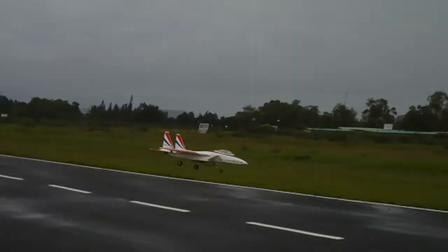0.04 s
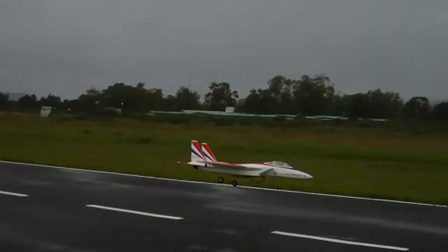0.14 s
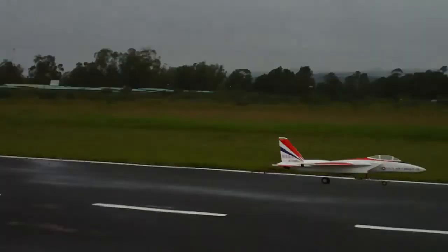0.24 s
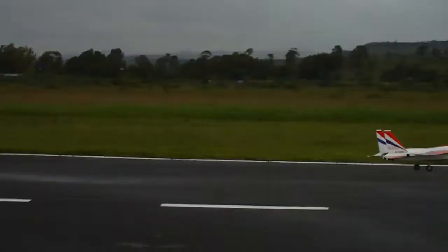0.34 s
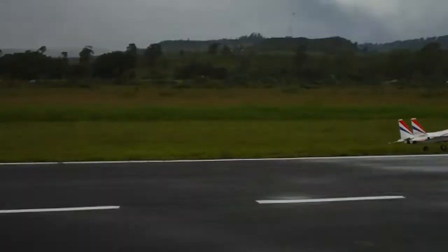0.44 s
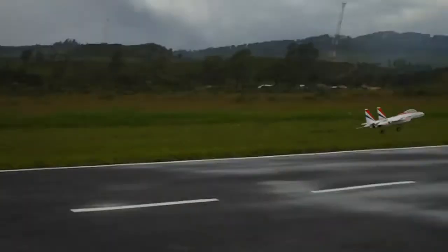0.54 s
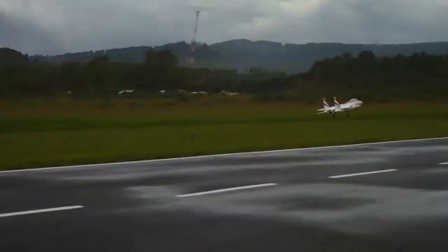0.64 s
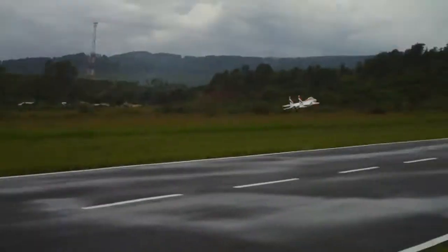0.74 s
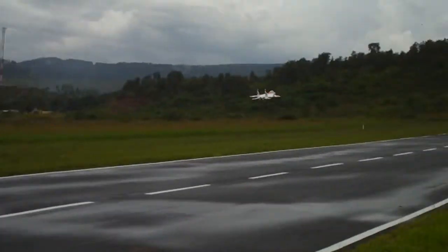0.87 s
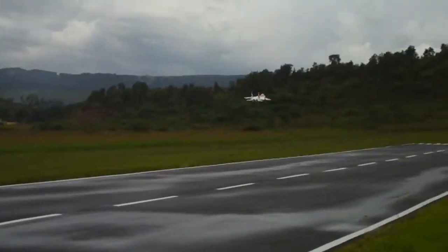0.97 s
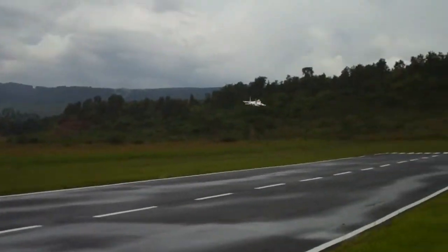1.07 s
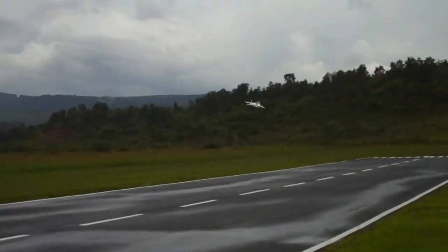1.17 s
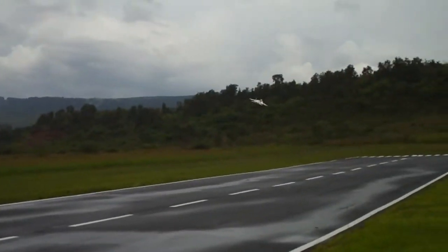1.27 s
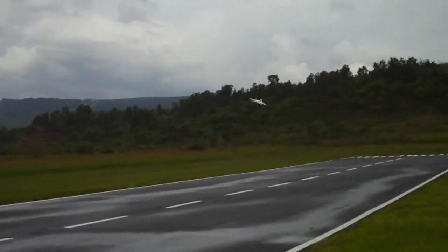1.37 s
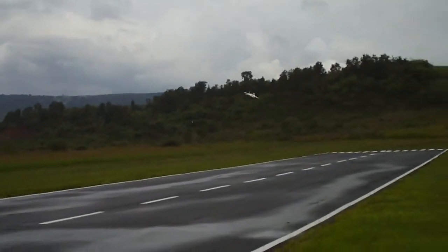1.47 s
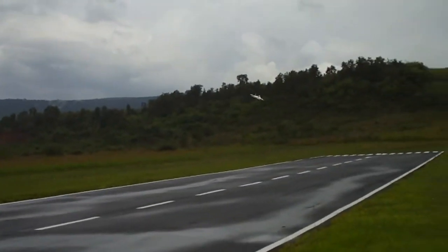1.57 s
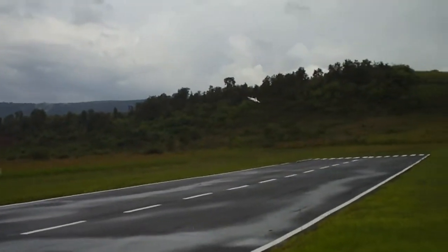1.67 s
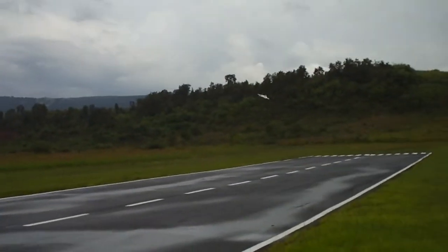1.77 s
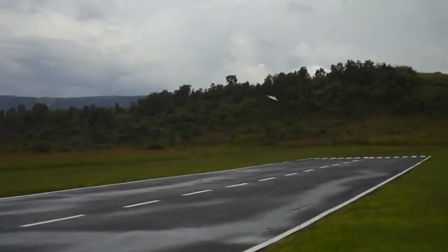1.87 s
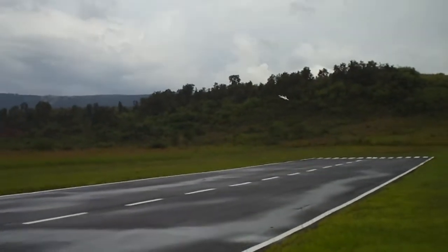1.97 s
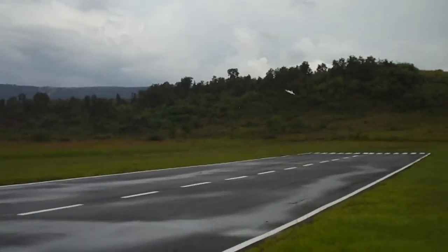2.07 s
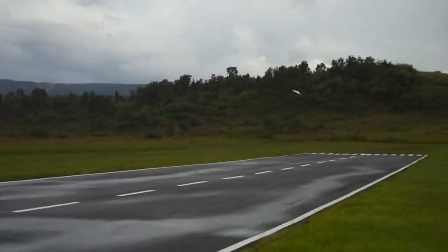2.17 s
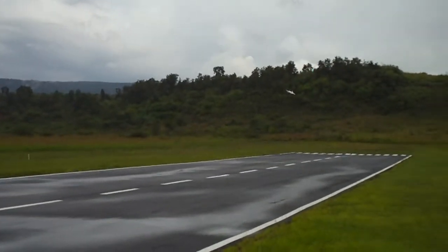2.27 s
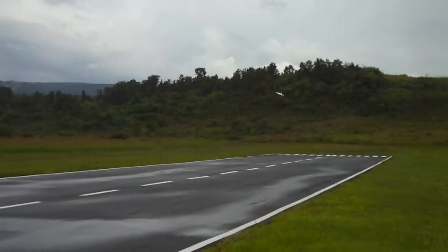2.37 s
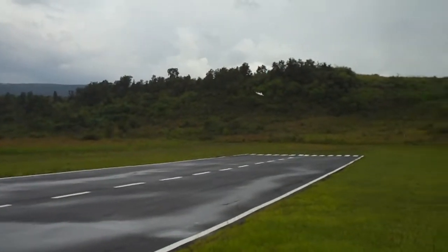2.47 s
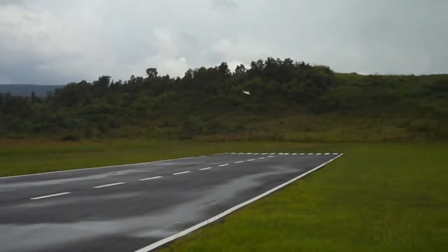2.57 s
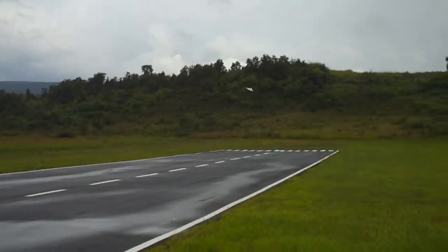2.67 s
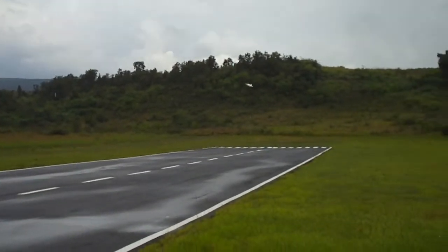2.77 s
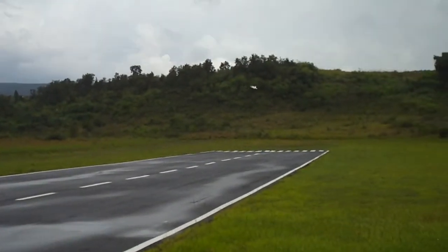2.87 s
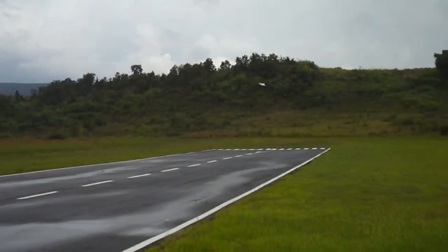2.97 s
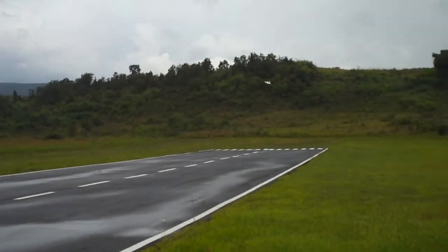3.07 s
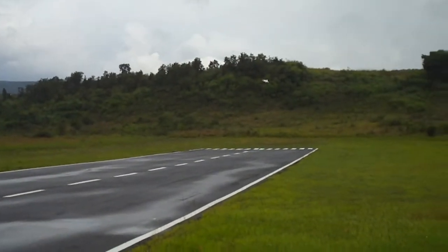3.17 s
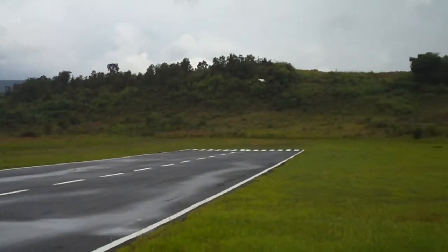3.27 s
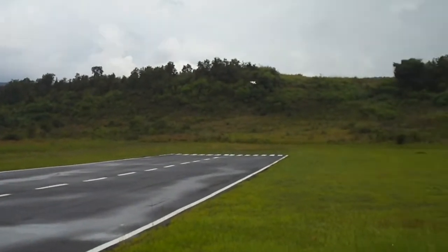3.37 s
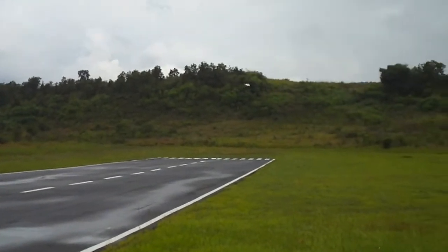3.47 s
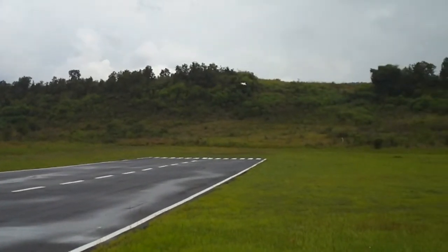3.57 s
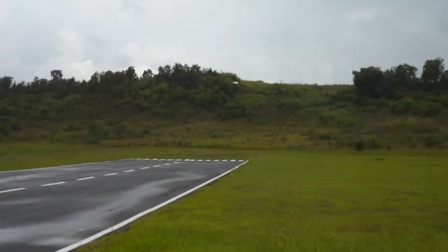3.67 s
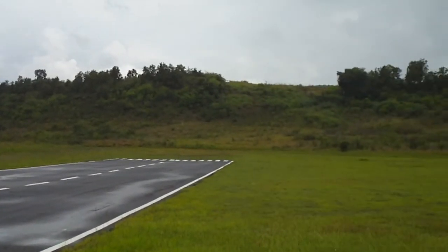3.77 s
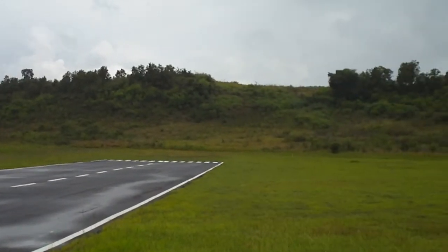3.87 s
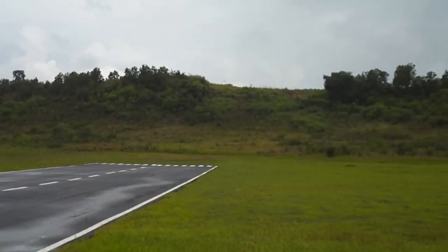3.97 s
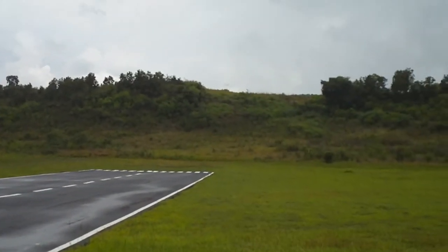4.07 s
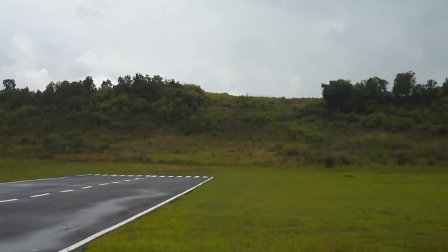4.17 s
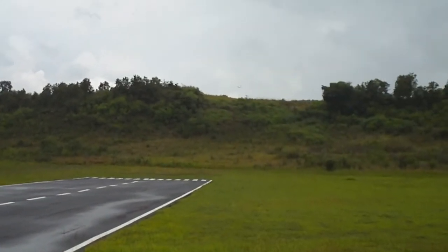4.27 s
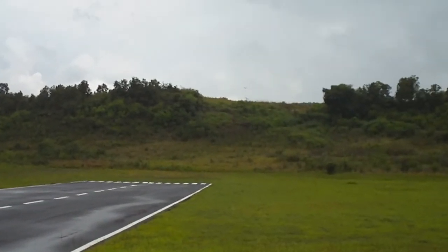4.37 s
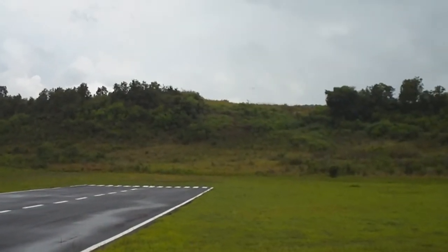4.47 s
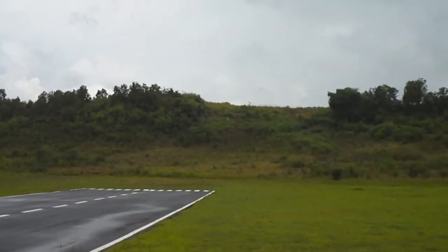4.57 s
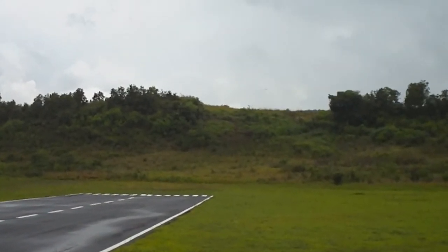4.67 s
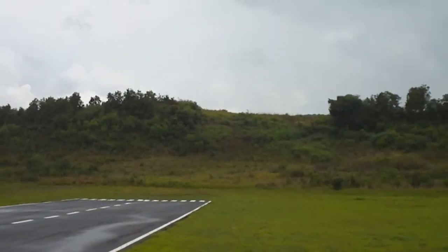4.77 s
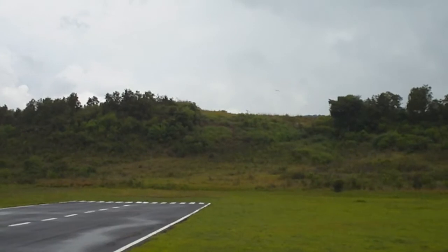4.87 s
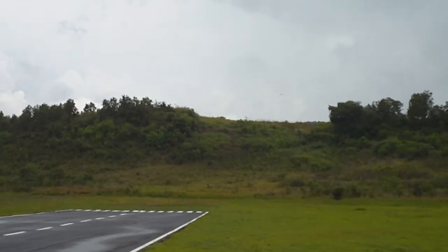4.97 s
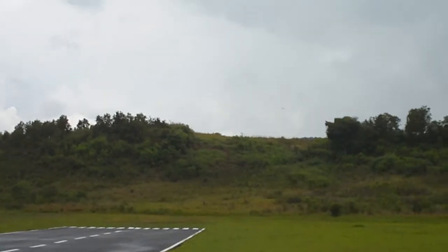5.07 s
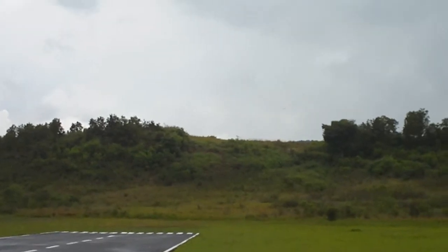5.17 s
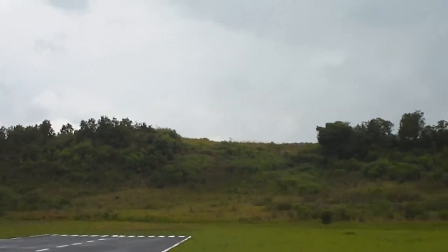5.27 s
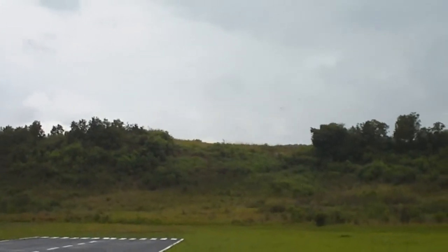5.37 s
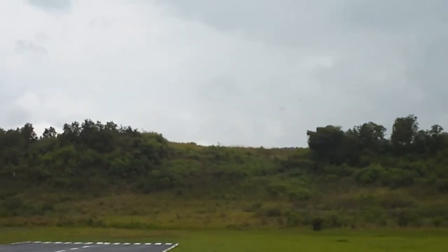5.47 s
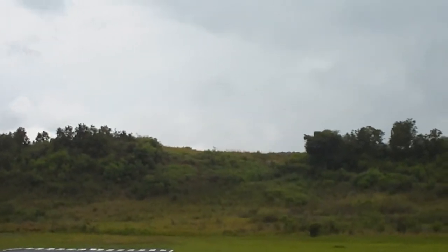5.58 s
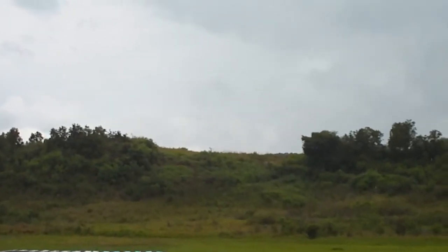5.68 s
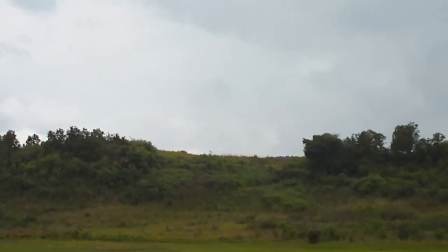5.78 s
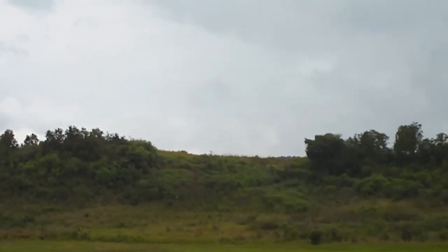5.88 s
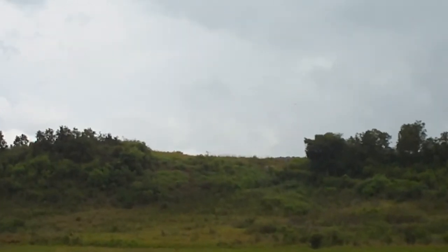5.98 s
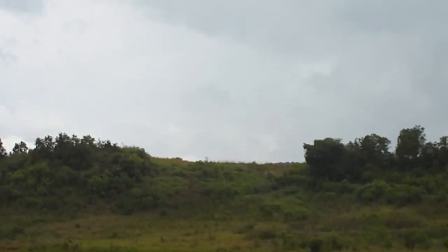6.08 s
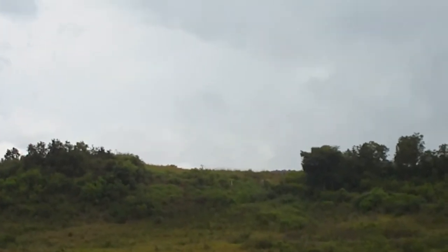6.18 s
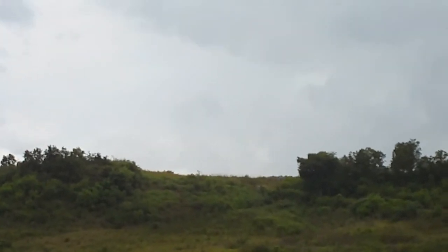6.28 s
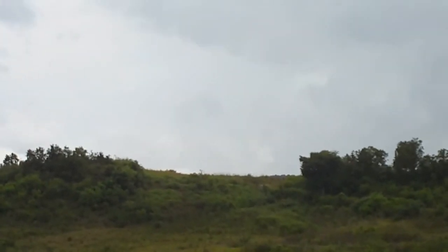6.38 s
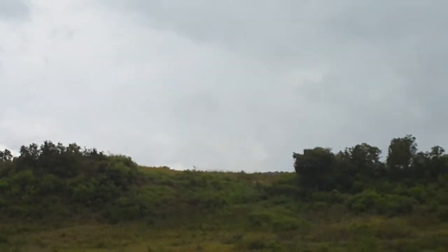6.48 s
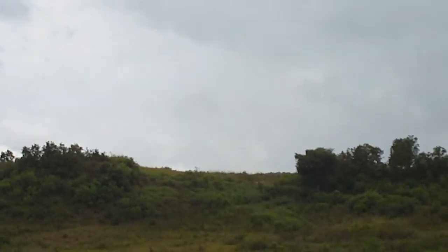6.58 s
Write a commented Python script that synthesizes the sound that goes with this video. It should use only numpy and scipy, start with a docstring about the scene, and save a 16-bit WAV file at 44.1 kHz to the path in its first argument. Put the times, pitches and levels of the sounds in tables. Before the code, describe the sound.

Shrill electric model jet with airy exhaust hiss sweeps low past, drops in pitch, throttles up while receding, leaving faint whine, insect buzz and bird chips.

```python
"""An electric ducted-fan model jet passes low over a runway, recedes, then opens the throttle as it climbs away.
Shaft harmonics and shaped exhaust noise reach the microphone with Doppler shift, directivity, spreading and
air absorption; interference with the ground bounce sweeps a comb through them. From the start there are also
soft air noise, a far engine's harmonics and insects made of sliding tones and narrow-band noise. Filtered
noise clicks and low bumps come from the hand-held camera, and a few gliding bird chips end the scene."""
import sys
import numpy as np
from scipy import signal
from scipy.fft import rfft, irfft, next_fast_len
from scipy.io import wavfile
from scipy.ndimage import uniform_filter1d

SR = 44100
rng = np.random.default_rng(int(sys.argv[2]) if len(sys.argv) > 2 else 0)


def log_audio(samples):
    """Write samples as a 16-bit WAV file to the path given in sys.argv[1]."""
    # one column per channel
    frames = np.atleast_2d(samples).T
    # limit to full scale, then quantise
    limited = np.clip(frames, -1, 1)
    pcm = np.round(limited * 32767).astype(np.int16)
    wavfile.write(sys.argv[1], SR, pcm)


N = 292383
TIME = np.arange(N) / SR
FRAME_S = np.arange(N // 128 + 6) * 128 / SR
# the fly-by: moment of closest approach, its distance, airspeed
PASS_S, NEAREST_M, SPEED_M_PER_S = .375, 5.31, 22.28
SOUND_M_PER_S = 343


def amp(db):
    """Decibel law: twenty decibels are a factor of ten in amplitude."""
    return 10 ** (np.asarray(db) / 20)


def unit(x):
    """Normalization by root mean square: scales x to rms 1."""
    return x / np.sqrt(np.mean(x ** 2) + 1e-20)


def at(rows, t):
    """Linear interpolation: the columns of a curve table at times t."""
    s, *columns = np.transpose(rows)
    return [np.interp(t, s, c) for c in columns]


def colour(points, hz):
    """Spectral envelope: interpolates a table on a log-frequency axis."""
    f, values = np.transpose(points)
    return np.interp(np.log(hz + 1), np.log(f), values)


def shaped(x, gain):
    """Linear filtering: multiplies the spectrum of x by a gain given as a function of frequency."""
    size = next_fast_len(len(x), real=True)
    spectrum = rfft(x, size) * gain(np.fft.rfftfreq(size, 1 / SR))
    return irfft(spectrum, size)[:len(x)]


def drift(hz):
    """Low-passed noise: random motion of rms 1, up to about hz."""
    return unit(shaped(rng.standard_normal(N), lambda f: 1 / (1 + (f / hz) ** 4)))


def band(hz, width_hz):
    """Resonance: noise of rms 1 concentrated around one frequency."""
    return unit(shaped(rng.standard_normal(N), lambda f: 1 / (1 + ((f - hz) / width_hz) ** 4)))


def flight(t):
    """Doppler effect: distance (m), angle from the nose (degrees), heard shaft rate (Hz), throttle (0-1)."""
    # shaft rate as the throttle opens from part to full: (time [s], rate [Hz])
    motor = [(.68, 574.6), (1.969, 576.5), (2.097, 603), (2.384, 630), (2.466, 630.4), (2.626, 631.1),
             (2.69, 640.7), (2.8, 643), (3.03, 643.6), (5.8, 643.4), (6.63, 643)]
    along = SPEED_M_PER_S * (t - PASS_S)
    metres = np.hypot(along, NEAREST_M)
    motor_hz = at(motor, t)[0]
    receding_mach = SPEED_M_PER_S / SOUND_M_PER_S * along / metres
    heard_hz = motor_hz / (1 + receding_mach)
    throttle = (motor_hz - motor_hz.min()) / np.ptp(motor_hz)
    angle = np.degrees(np.arccos(-along / metres))
    return metres, angle, heard_hz, throttle


def travel(hz, t, metres, fall_db, air_db_per_m_khz=.0095, grazing_m=5.5):
    """Two-path interference: gain from spreading (dB per doubling), air absorption and the ground bounce."""
    # delay of the bounce, wavering at first, then growing as the jet climbs away: (time [s], delay [ms])
    bounce_delay = [(0, 0.81), (.4, 0.83), (1, 0.72), (1.63, 0.83), (2, 0.83), (2.4, 0.82), (2.9, 0.77),
                    (3.8, 0.95), (4.35, 1.042), (5.15, 1.234), (5.88, 1.407), (6.63, 1.53)]
    # grass softens the bounce: (frequency [Hz], strength [0-1])
    grass_bounce = [(100, 0.24), (600, 0.38), (1200, 0.57), (1800, 0.58), (2400, 0.76), (3200, 0.71),
                    (6000, 0.41), (9000, 0.051), (15000, .15)]
    # grass holds the bounce back: (frequency [Hz], lag [cycles])
    grass_lag = [(60, .03), (600, 0.27), (1200, 0.53), (1800, 0.65), (2400, 0.92), (3200, 1.09),
                 (5400, 1.19), (9000, 1.04)]
    # the bounce grows strong well beyond the grazing distance
    grazing = np.clip(1 - grazing_m / metres, 0, 1)
    bounce = np.clip(colour(grass_bounce, hz), 0, .95) * grazing
    cycles = hz * at(bounce_delay, t)[0] / 1000 + colour(grass_lag, hz)
    comb = np.sqrt(1 + 2 * bounce * np.cos(2 * np.pi * cycles) / (1 + bounce ** 2))
    spreading_db = fall_db * np.log2(metres / NEAREST_M)
    absorption_db = air_db_per_m_khz * metres * hz / 1000
    return comb * amp(-spreading_db - absorption_db)


def beam(directions_db, full_db, banked_db):
    """Directivity: level (dB) sent towards the microphone, by direction, throttle and bank."""
    # directions from the nose, from ahead to astern: (angle [degrees])
    beam_deg = [30, 55.4, 98.5, 140.2, 160, 175.2]
    # the jet banks into a turn between these times: (start [s], end [s])
    turn_s = [2.87, 3.55]
    _, angle, _, throttle = flight(FRAME_S)
    bank = np.interp(FRAME_S, turn_s, [0, 1])
    return np.interp(angle, beam_deg, directions_db) + throttle * full_db + bank * banked_db


def fan(flutter=0.000402, strong_waver_db=0.64, weak_waver_db=1.5, near_waver_db=0.2754, fall_db=3.95):
    """Harmonic radiation: each shaft order has its beam; turbulent air flickers high orders most when near."""
    # strong tones at the closest distance:
    # (shaft order, level in six directions [dB x 6], added at full throttle [dB], added when banked [dB])
    strong_tones = [(1, -9, -17, -14.5, -22.5, -28.5, -31, 4, 0.5),
                    (2, -26.5, -12, -6.5, -30, -24.5, -23, -3.5, -4),
                    (3, -11.5, -16, -16.5, -18.5, -22.5, -33, 5, 1),
                    (4, -20.5, -23, -32.5, -36.5, -39, -38, 10, 0.5),
                    (5, -4.5, -16, -17, -16, -24.5, -31, 6.5, 4),
                    (10, -21, -25.5, -23, -24, -18, -28, 3.5, 2.5),
                    (15, -39, -41, -41, -22, -30, -21.5, 3.5, -1.5)]
    # directions where a strong tone dips, and one brief fade of order 10 as the jet recedes:
    # (shaft order, angle from the nose [degrees], width [degrees], depth [dB])
    dips = [(1, 52, 19, 11), (2, 81.2, 11.9, 31), (2, 106, 4, 23), (3, 62.3, 8, 6), (3, 126.3, 15, 19),
            (4, 51.5, 3.4, 19), (4, 74.3, 1.8, 18), (5, 32, 4.5, 8), (5, 87, 1.4, 14), (5, 115, 4.3, 25),
            (10, 34.4, 3, 24), (10, 112, 6, 32), (10, 145, 1.9, 15), (10, 169.3, 0.5, 20)]
    # weak tones, before their beam:
    # (shaft order, level [dB], added at full throttle [dB], added when banked [dB])
    weak_tones = [(6, -37, 11, 1), (7, -38, 12, -3), (9, -44, 6.5, 0), (11, -41.5, 18, -14),
                  (12, -42, -12, 4), (13, -46, 4, -4), (14, -35, -5, -4), (16, -47, 7, 5), (20, -42, 7, -3),
                  (25, -44, 3, -6), (26, -41, -4, -6)]
    # beam shared by the weak tones: (level in each of six directions [dB])
    weak_beam_db = [10, 3, 1.5, 7.5, -0.5, 0.5]
    turns = np.cumsum(flight(TIME)[2] * (1 + flutter * drift(23.0))) / SR
    metres, angle, shaft_hz, _ = flight(FRAME_S)

    def tone(order, db, waver_db):
        """Amplitude modulation: one flickering sinusoid locked to the shaft."""
        frame_gain = amp(db) * travel(order * shaft_hz, FRAME_S, metres, fall_db)
        gain = np.interp(TIME, FRAME_S, frame_gain)
        depth_db = waver_db + near_waver_db * min(order, 10) * NEAREST_M / metres
        flicker_db = np.interp(TIME, FRAME_S, depth_db) * drift(23)
        wave = np.sin(2 * np.pi * (order * turns + rng.random()))
        return np.sqrt(2) * gain * amp(flicker_db) * wave

    out = np.zeros(N)
    # the strong tones leave the duct in lobes, which sweep over the microphone during the pass
    for order, *beam_db, full_db, banked_db in strong_tones:
        dip_db = sum(depth * np.exp(-abs((angle - deg) / width))
                     for k, deg, width, depth in dips if round(k) == round(order))
        out += tone(round(order), beam(beam_db, full_db, banked_db) - dip_db, strong_waver_db)
    for order, db, full_db, banked_db in weak_tones:
        out += tone(round(order), db + beam(weak_beam_db, full_db, banked_db), weak_waver_db)
    return out


def jet(patch_db=.6, gust_db=0.4, fall_db=4.85):
    """Turbulent mixing noise: dulled by distance, with humps that follow the shaft and the ground comb."""
    # exhaust bands at the closest distance:
    # (centre [Hz], level in six directions [dB x 6], added at full throttle [dB], added when banked [dB])
    jet_bands = [(348, -37, -37.5, -40, -40, -41.5, -40.5, 5.5, 4),
                 (850, -27, -32, -31.5, -30.5, -32.5, -31, 2, 2.5),
                 (4830, -28, -30, -30.5, -30.5, -28.5, -28.5, 3.5, -1),
                 (13500, -34, -40, -35.5, -31, -29, -32, 1, 2)]
    # colour relative to those bands: (frequency [Hz], density [dB per Hz])
    jet_colour = [(60, -44), (220, -29.5), (400, -28.5), (780, -25), (1000, -30.5), (1400, -29.5),
                  (2150, -33.5), (3400, -28.5), (4800, -32), (6200, -27), (7400, -29.5), (8700, -27),
                  (10200, -33), (15000, -37)]
    # turbulence chopped by the blades at full throttle: (shaft order, width [Hz], height [dB])
    humps = [(5.85, 230, 5), (10, 170, 4), (11, 168, 3.5)]
    bin_hz = np.fft.rfftfreq(512, 1 / SR)[:, None]
    metres, _, shaft_hz, throttle = flight(FRAME_S)
    db = colour(jet_colour, bin_hz)
    for (_, *beam_db, full_db, banked_db), pick in zip(jet_bands, np.eye(len(jet_bands))):
        # each band's share falls to nothing at its neighbours' centres
        share = colour([(row[0], p) for row, p in zip(jet_bands, pick)], bin_hz)
        db = db + share * beam(beam_db, full_db, banked_db)
    for order, width, hump_db in humps:
        db = db + throttle * hump_db * np.exp(-((bin_hz - order * shaft_hz) / width) ** 2)
    real, imag, patches = rng.standard_normal((3,) + db.shape)
    # patches of level, smooth over frequency and time
    patches = uniform_filter1d(patches, size=8, axis=0)
    patches = unit(uniform_filter1d(patches, size=20, axis=1))
    db = db + patch_db * patches + gust_db * np.interp(FRAME_S, TIME, drift(15))
    spectrum = (real + 1j * imag) * amp(db) * travel(bin_hz, FRAME_S, metres, fall_db)
    return signal.istft(spectrum * np.sqrt(1.5 * SR / 512), nperseg=512, noverlap=384)[1][:N]


def field(hum_hz=46.83, waver_db=1.8):
    """Fourier synthesis: a far engine's low throb swells and fades over soft, steady air noise."""
    # air over the field: (frequency [Hz], density [dB per Hz])
    air_colour = [(20, -87), (40, -85), (70, -74), (130, -73.5), (250, -75.5), (700, -80.5), (1500, -90),
                  (2700, -82.5), (4500, -84), (7500, -91), (10000, -89), (13000, -100), (15500, -100)]
    # far engine's swell: (time [s], level [dB])
    hum = [(0, -43), (.4, -40), (1.6, -40), (2.4, -49), (2.85, -49), (3.15, -43), (3.5, -40), (4.2, -53.5),
           (4.55, -46), (4.95, -44), (5.4, -50.5), (6.63, -52.5)]
    # its harmonics, relative to the swell: (order, level [dB])
    hum_orders = [(2, -3), (3, -3), (4, -5), (5, -21), (6, -14.5), (7, -13.5), (8, -18.5)]
    air = shaped(rng.standard_normal(N), lambda f: amp(colour(air_colour, f))) * np.sqrt(SR / 2)
    turns = np.cumsum(hum_hz * (1 + 0.00295 * drift(3.45))) / SR
    # harmonics in step: one soft pulse for each firing
    throb = sum(amp(db + waver_db * drift(2.3)) * np.sin(2 * np.pi * round(order) * turns)
                for order, db in hum_orders)
    return air + np.sqrt(2) * throb * amp(at(hum, TIME)[0])


def insects(strokes_hz=94.7, high_hz=9250, low_hz=7950, back_db=-5, overtone_db=-23, jitter=.008):
    """Stridulation: one insect's wing strokes slide down, with a higher return stroke; another hisses evenly."""
    # insect that rasps in strokes: (time [s], level [dB])
    rasp = [(0, -35), (2.0, -38), (3.2, -41), (4.5, -43), (5.3, -45.5), (6.63, -43)]
    # insect that hisses evenly: (time [s], level [dB])
    shrill = [(0, -50), (1.4, -53), (2.4, -37.5), (3.4, -43.5), (4.48, -40), (4.52, -53), (6.63, -70)]
    stroke = (np.cumsum(strokes_hz * (1 + jitter * drift(30))) / SR) % 1
    pitch = high_hz + (low_hz - high_hz) * stroke + 170 * drift(723)
    swell = np.sin(np.pi * stroke) ** 2
    closing = unit(swell * np.sin(2 * np.pi * np.cumsum(pitch) / SR) * amp(0.7 * drift(150)))
    opening = (1 - swell / 2) * amp(back_db) * band(9430, 360)
    opening += (1 - swell) * amp(overtone_db) * band(11000, 300)
    rasping = (closing + opening) * amp(at(rasp, TIME)[0])
    hissing = band(8900, 340) * amp(at(shrill, TIME)[0])
    return rasping + hissing


def handling():
    """Impulse response: dry clicks of the camera body are band-passed bursts; bumps are low wave packets."""
    # clicks: (time [s], peak [dB], centre [Hz], width [octaves], decay of the burst before filtering [s])
    clicks = [(1.3085, -11, 4040, 0.74, 0.0011), (1.3098, -14.5, 2510, .15, 0.0022),
              (1.310, -4.5, 4500, 0.94, 0.0013), (1.3655, -10, 3500, .6, 0.00058),
              (1.424, -24, 420, 0.81, 0.016), (2.6326, -17.5, 1547, 0.5, 0.00044),
              (2.643, -21, 2000, 0.44, 0.00063), (6.3153, -22, 3810, 0.51, 0.00099),
              (6.3185, -16, 5010, 0.98, 0.0021)]
    # soft bumps on the microphone: (time [s], peak [dB], frequency [Hz], half length [s])
    bumps = [(0.373, -27, 95, 0.0071), (3.512, -35, 79, 0.013), (3.717, -32, 86.4, 0.0095),
             (4.56, -47, 65, .02), (5.87, -38, 75, .02), (6.424, -30.5, 90.6, 0.00782),
             (6.457, -35, 119, 0.0054), (6.482, -26.5, 100, 0.0078), (6.579, -34, 100.2, .007)]
    out = np.zeros(N)
    t = np.arange(2048) / SR
    for s, db, hz, octaves, decay in clicks:
        burst = rng.standard_normal(len(t)) * np.exp(-t / decay)
        # padding on both sides leaves room for the filter to ring
        click = shaped(np.pad(burst, len(t)),
                       lambda f: np.exp(-.5 * (np.log2((f + 1) / hz) / octaves) ** 2))
        part = out[round(s * SR) - len(t):][:len(click)]
        part += (amp(db) * click / abs(click).max())[:len(part)]
    for s, db, hz, length in bumps:
        envelope = np.exp(-np.minimum(((TIME - s) / length) ** 2, 20))
        out += amp(db) * envelope * np.cos(2 * np.pi * hz * (TIME - s))
    return out


def bird():
    """Frequency modulation: short whistles glide linearly in pitch under a tapered envelope."""
    # chips: (time [s], length [s], start [Hz], end [Hz], peak [dB])
    chips = [(6.299, 0.028, 3910, 3210, -39), (6.47, 0.031, 4500, 3074, -39),
             (6.517, 0.01345, 2970, 3830, -38)]
    out = np.zeros(N)
    for s, length, start_hz, end_hz, db in chips:
        hz = np.linspace(start_hz, end_hz, round(length * SR))
        whistle = np.sin(2 * np.pi * np.cumsum(hz) / SR)
        out[round(s * SR):][:len(hz)] += amp(db) * whistle * signal.windows.tukey(len(hz), .5)
    return out


def scene():
    """Superposition: all sources add at one microphone, heard on both channels."""
    mono = fan() + jet() + field() + insects() + handling() + bird()
    return np.array([mono, mono])


def record(dry, notch_hz=11200, notch_width_hz=750):
    """Band limiting: the camera has a deep notch in the treble and a steep low-pass edge."""
    notched = [shaped(x, lambda f: 1 - np.exp(-((f - notch_hz) / notch_width_hz) ** 2)) for x in dry]
    edge = signal.firwin(511, 15310, window=("kaiser", 9), fs=SR)
    return signal.oaconvolve(np.array(notched), edge[None], "same", axes=1)


dry = scene()
out = record(dry)
log_audio(out)
```